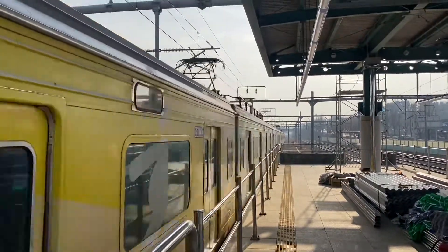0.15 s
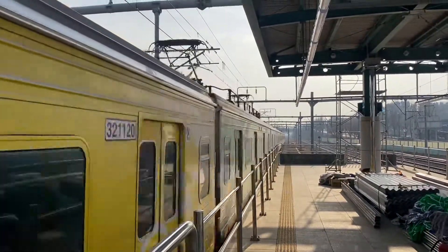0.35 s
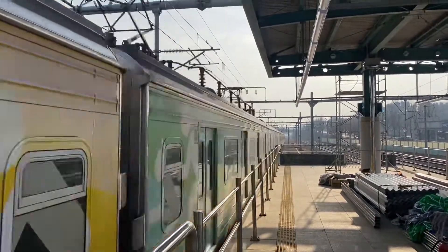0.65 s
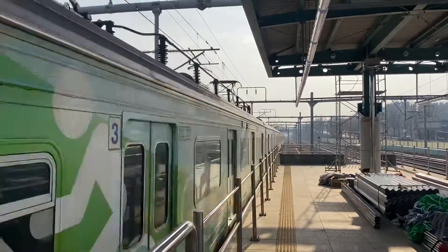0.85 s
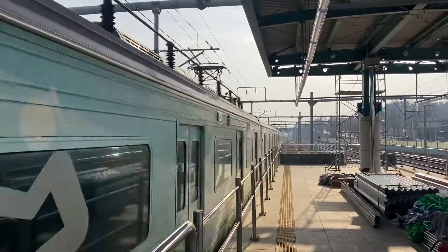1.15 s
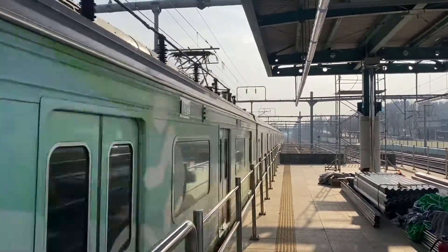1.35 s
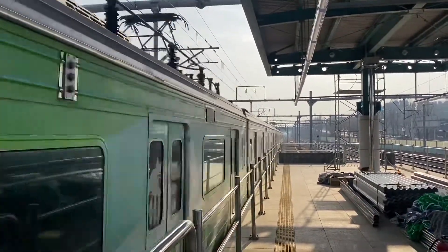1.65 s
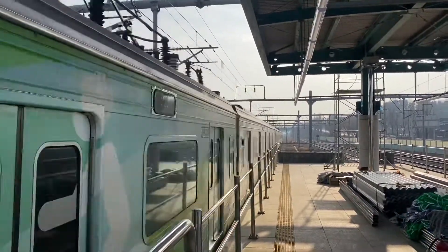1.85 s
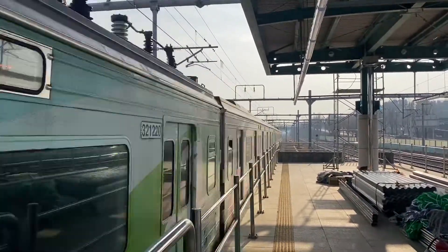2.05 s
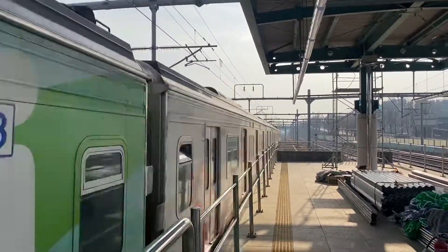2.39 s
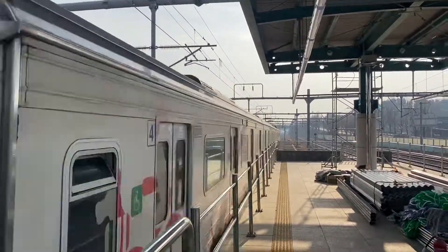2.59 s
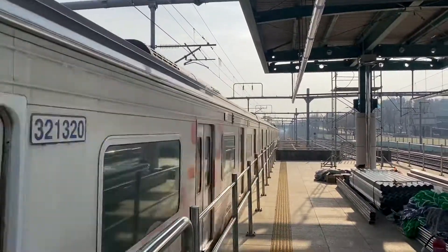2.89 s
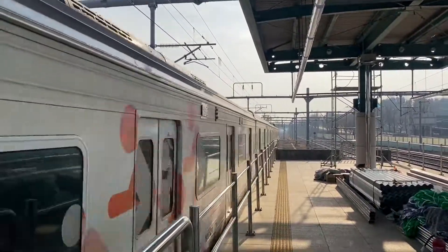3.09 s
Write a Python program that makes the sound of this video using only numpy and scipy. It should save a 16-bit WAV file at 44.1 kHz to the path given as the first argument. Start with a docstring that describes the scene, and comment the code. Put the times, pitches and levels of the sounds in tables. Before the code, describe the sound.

Electric commuter train brakes past very close, rumbling roar, sinking motor whine and buffeting air thumps.

```python
"""An electric commuter train brakes past an open platform, a step from a phone's two microphones.
Its wheels roar on the rails: patchy stereo noise through wheel and rail resonances, with a hissing ring.
Two drive whines, sums of sine partials, sink with the speed and swell as motor bogies pass.
The air dragged along by the cars buffets the microphones: lumpy low noise and single decaying thumps."""
import sys
import numpy as np
from scipy import signal
from scipy.fft import rfft, irfft, next_fast_len
from scipy.io import wavfile
from scipy.ndimage import uniform_filter1d, map_coordinates

SR = 44100
rng = np.random.default_rng(int(sys.argv[2]) if len(sys.argv) > 2 else 0)


def master(y):
    """Save y as 16-bit WAV."""
    cut = np.clip(np.atleast_2d(y).T, -1, 1)
    pcm = np.round(cut * 32767)  # scale
    wavfile.write(sys.argv[1], SR, pcm.astype(np.int16))


def decibels_to_gain(level_db):
    """Convert a level in decibels to a linear amplitude gain (20 dB per decade)."""
    exponent = np.asarray(level_db, float) / 20
    return 10 ** exponent


N = 142443  # samples

# train speed, as the pitch of the high drive whine: (time [s], frequency [Hz])
HIGH_WHINE_PITCH = [(0, 768), (.7, 752), (1.3, 730), (1.8, 718), (2.0, 704), (2.2, 698), (2.5, 686),
                    (2.75, 662), (3.23, 645)]
# drive whine partials before their common trim: (time [s], level [dB])
LOW_WHINE_LEVEL = [(0.0, -18.5), (0.03, -33.5), (0.05, -28), (0.07, -35.5), (0.12, -44), (0.3, -36),
                   (0.35, -22), (0.38, -37), (0.4, -22), (0.46, -57), (0.48, -24.5), (0.58, -30.5),
                   (0.61, -18.5), (0.65, -14.5), (0.67, -36), (0.7, -19), (0.78, -33.5), (0.8, -25),
                   (0.86, -45), (0.91, -27), (0.96, -40), (1.06, -26.5), (1.16, -44), (1.18, -49),
                   (1.25, -37), (1.29, -36), (1.33, -33.5), (1.47, -37), (1.5, -25), (1.57, -34),
                   (1.59, -23), (1.65, -41.5), (1.67, -22.5), (1.95, -21), (1.99, -25), (2.09, -33.5),
                   (2.1, -27), (2.19, -26), (2.26, -19), (2.28, -26), (2.33, -14), (2.37, -31),
                   (2.43, -13.5), (2.47, -41.5), (2.5, -24.5), (2.55, -35), (2.98, -39.5), (3.0, -48),
                   (3.04, -33), (3.07, -42), (3.19, -43), (3.23, -60)]
HIGH_WHINE_LEVEL = [(0.0, -40.5), (0.06, -30.5), (0.12, -38), (0.15, -20.5), (0.18, -34.5), (0.22, -18.5),
                    (0.26, -23.5), (0.31, -23), (0.37, -37), (0.47, -27.5), (0.49, -41), (0.55, -29),
                    (0.57, -38), (0.67, -29), (0.79, -35.5), (0.83, -32), (0.88, -34.5), (0.91, -27),
                    (0.95, -45), (1.04, -29.5), (1.13, -46), (1.4, -34.5), (1.42, -42.5), (1.65, -33.5),
                    (1.74, -44.5), (1.81, -25), (1.87, -36), (1.91, -26.5), (2.01, -29), (2.08, -25.5),
                    (2.17, -32), (2.21, -23.5), (2.31, -34.5), (2.34, -21), (2.46, -39), (2.47, -27.5),
                    (2.74, -37), (2.76, -42), (3.21, -41), (3.23, -43.5)]
# the octave over the low whine, before the trim: (time [s], level [dB])
LOW_WHINE_OCTAVE = [(0, -39), (.7, -56), (.82, -32), (1, -50.5), (1.14, -40.5), (1.3, -48.5), (1.65, -49.5),
                    (1.8, -40.5), (1.93, -34.5), (2, -36), (2.1, -30.5), (2.19, -33), (2.24, -53),
                    (2.3, -30), (2.4, -42), (2.5, -37.5), (2.65, -56), (3.23, -61)]
# faint tone an octave under the high whine, before the trim: (time [s], level [dB])
HIGH_WHINE_UNDERTONE = [(0, -51), (1.7, -54.5), (1.9, -39), (2.1, -32), (2.3, -32), (2.5, -31),
                        (2.6, -37.5), (2.75, -51), (3.23, -57)]
# faint upper partials, before the trim:
# (time [s], 3rd of the low [dB], 2nd of the high [dB], 3rd of the high [dB])
WHINE_OVERTONES = [(0, -48, -49, -56.5), (.3, -48, -50, -68), (.5, -54, -51, -57), (1.5, -78, -50, -54.5),
                   (1.65, -49, -43, -55), (1.75, -46, -40, -53), (1.85, -41, -41, -64),
                   (1.96, -48, -39.5, -43.5), (2.08, -40.5, -52, -60), (2.2, -41, -63.5, -50),
                   (2.55, -75, -64, -54.5), (2.7, -68, -70, -61), (3.23, -66, -68, -79)]

# slipstream strength at the microphones, before its gain and random swing: (time [s], level [dB])
DRAUGHT_LEVEL = [(0.0, -12.5), (0.025, -12), (0.045, -21.5), (0.07, -14.5), (0.1, -22.5), (0.16, -26.5),
                 (0.21, -22), (0.22, -30.5), (0.32, -20.5), (0.37, -31), (0.45, -23), (0.49, -54),
                 (0.52, -33), (0.74, -21), (0.76, -23.5), (0.79, -25), (0.81, -18.5), (0.835, -23),
                 (0.86, -16.5), (0.89, -20.5), (0.94, -25.5), (0.99, -25), (1.02, -23), (1.07, -31.5),
                 (1.61, -31), (1.72, -22.5), (1.74, -28), (1.79, -18.5), (1.95, -34.5), (2.0, -24.5),
                 (2.06, -23.5), (2.17, -23), (2.3, -25.5), (2.42, -22.5), (2.5, -25), (2.6, -22),
                 (2.65, -25), (2.7, -23), (2.78, -25), (2.84, -31), (2.89, -23.5), (2.95, -28.5),
                 (3.02, -22), (3.08, -22.5), (3.15, -25), (3.23, -28.5)]
# relative spectrum of the buffeting: (frequency [Hz], density [dB per Hz])
BUFFET_SPECTRUM = [(20, -22), (45, 1.5), (80, 4.5), (140, -3), (255, -6.5), (500, -8.5), (800, -20.5),
                   (1200, -38.5), (2000, -49.5), (3300, -100)]
# single air thumps: (start [s], level before the trim [dB], pitch before the glide [Hz],
# length of the swell up to its peak [cycles])
AIR_THUMPS = [(0.007, -8.5, 396, 1.14), (0.014, -9.5, 550, 1.6), (0.02, -9, 330, 1.5),
              (0.031, -7.5, 141.4, 1.26), (0.046, -13, 447, 1.1), (0.056, -1.5, 196.6, 1.2),
              (0.067, -11.5, 187.5, 1.1), (0.086, -9, 109.3, 1.4), (0.104, -12, 111.7, 1.1),
              (0.197, -12, 97, 1.1), (0.755, -8.5, 129.7, 2.1), (0.77, -7, 106.5, 2.1),
              (0.772, -7, 292, 1.17), (0.783, -12, 200, 1.5), (0.801, -11, 131, 1.6),
              (0.807, -6.5, 358, 1.1), (0.817, -0.5, 276, 1.46), (0.827, -4, 520, 1),
              (0.844, -0.5, 428, 0.86), (0.851, -6.5, 295, 1.8), (0.862, -5, 195, 1.3),
              (0.896, -14, 160, 1.7), (0.914, -12.5, 185.4, 1.8), (0.928, -9.5, 164.5, 0.98),
              (0.963, -12.5, 120.5, 0.91), (1.004, -12.5, 139.7, 1.5), (1.03, -16.5, 151.2, 1.5),
              (1.775, -34, 390, 1.7), (2.681, -12.5, 286, 2.2), (2.706, -13, 273, 2.46),
              (2.747, -16, 201, 1.1), (2.884, -20, 272, 7.5), (2.9, -21, 272.3, 4.3),
              (2.921, -22, 147, 2.2), (2.977, -14, 164, 1.1), (3, -14.5, 267, 1.4), (3.036, -18, 290, 1.6),
              (3.05, -14, 323, 1.2), (3.095, -12.5, 257, 1.1), (3.116, -18, 99.4, 1.35),
              (3.138, -18, 83, 0.96), (3.155, -15, 84, 0.83), (3.19, -24, 90, 1.5)]

# rolling noise strength, before its gain and swing: (time [s], level [dB])
ROLLING_LEVEL = [(0.0, -37), (0.11, -40), (0.2, -38.5), (0.81, -38.5), (0.83, -36.5), (0.88, -39.5),
                 (1.46, -41.5), (1.93, -39.5), (3.0, -43), (3.07, -42.5), (3.23, -45.5)]
# gain of the roar's treble: (time [s], level [dB])
TREBLE_SHEEN = [(0, -0.5), (.5, .5), (1.3, 1.5), (2, .5), (2.7, 0.5), (3.23, -2)]
# relative spectrum of the roar: (frequency [Hz], density [dB per Hz])
ROAR_SPECTRUM = [(30, -37), (150, -7), (300, -13), (450, -7), (600, -13), (800, -9), (950, -15),
                 (1180, -16.5), (1800, -23.5), (2500, -27.5), (3400, -32.5), (5000, -36), (6800, -41),
                 (9200, -44.5), (12000, -49), (15600, -51.5)]
# wheel and rail resonances in the roar: (frequency [Hz], width [Hz], level [dB])
WHEEL_RESONANCES = [(1340, 260, 1.5), (2107, 180, 3.5), (2945, 320, 5.5), (3550, 200, 5), (4390, 310, 3.5)]
# the wheels' ring, a band of hiss that swells as they pass: (time [s], level [dB])
RING_LEVEL = [(0, -68), (.5, -50), (1, -46.5), (1.4, -51.5), (1.8, -54), (2.2, -45), (2.6, -48.5),
              (2.85, -62), (3.23, -51)]

# likeness of the microphone pair, and its continuation upwards: (frequency [Hz], likeness [0-1])
MIC_LIKENESS = [(60, 0.99), (130, 0.87), (290, 0.34), (640, 0.56), (1410, 0.19), (3100, 0.81), (5500, 0.53)]
MIC_LIKENESS_TOP = [(6800, .97), (8000, .995), (16000, .995)]
# level lean of the pair: (frequency [Hz], left minus right [dB])
MIC_LEAN = [(60, -2.2), (110, 0.5), (200, -0.2), (380, 0.3), (700, 2.5), (1290, 0.2), (2380, 2.5),
            (4400, 2.6), (8120, 0), (15000, -0.26)]
# phase lead of the left port, and its continuation upwards: (frequency [Hz], left leads by [rad])
MIC_LEAD = [(0, -0.5), (860, 0.63), (2070, 7.5), (2760, 5.5), (5000, 4.5)]
MIC_LEAD_TOP = [(7000, 2 * np.pi), (9050, np.pi), (11050, 0), (15200, -2 * np.pi), (17300, -3 * np.pi)]


def unit(x):
    """x at rms 1."""
    return x / np.sqrt(np.mean(np.abs(x) ** 2) + 1e-20)


def along(points, hz):
    """Reads (frequency [Hz], value) points on a log frequency axis."""
    f, v = np.transpose(points)
    return np.interp(np.log(hz + 1), np.log(f + 1), v)


def curves(rows):
    """One value per sample for each column after the time."""
    s, *columns = np.transpose(rows)
    return [np.interp(np.arange(N) / SR, s, column) for column in columns]


def wobble(rate):
    """A smooth random curve through rate knots a second, at most 199."""
    knots = rng.standard_normal(int(N * 200 / SR) + 8)
    return map_coordinates(knots, [np.arange(N) * min(rate, 199) / SR])


def filtered(x, response):
    """x times a complex response of frequency."""
    m = next_fast_len(N + 8192)
    return irfft(rfft(x, m) * response(np.fft.rfftfreq(m, 1 / SR)), m)[..., :N]


def half_angle(alike):
    """Mixing angle [rad] of a shared and a differing signal that gives two channels this likeness."""
    return np.arccos(np.clip(alike, -1, 1)) / 2


def pair(shared, differing, alike):
    """Left and right as the sum and difference of a shared and a differing signal."""
    mid = np.cos(half_angle(alike)) * shared
    side = np.sin(half_angle(alike)) * differing
    return np.array([mid + side, mid - side])


def rush(gain, patchy_db):
    """Stereo noise of rms 1, with random gain patches in time and frequency, as alike as the two ports."""
    z = signal.stft(rng.standard_normal((2, N)), nperseg=512)[2]
    patches = uniform_filter1d(rng.standard_normal(z.shape[1:]), size=5, axis=0)
    patches = uniform_filter1d(patches, size=12, axis=1)
    two = signal.istft(z * decibels_to_gain(patchy_db * unit(patches)), nperseg=512)[1][:, :N]

    def mid_side_gain(hz):
        angle = half_angle(along(MIC_LIKENESS + MIC_LIKENESS_TOP, hz))
        return gain(hz) * np.array([np.cos(angle), np.sin(angle)])

    mid, side = filtered(two, mid_side_gain)
    return unit(np.array([mid + side, mid - side]))


def whines():
    """Partials of two drive tones tied to the speed: partly clean, partly blurred by rough teeth and many axles."""
    low_ratio = .5935  # pitch of the low whine over the high one
    steady_share = .85  # largest power share of clean tone
    clear_db, fade_db = 9, 12  # that share holds this far below the loudest, then fades to none over 12 dB
    blur_rate, alike, trim_db = 40.085, 0.56, 0.5  # knots a second; likeness; dB
    hz, = curves(HIGH_WHINE_PITCH)
    phase = 2 * np.pi * np.cumsum(hz) / SR
    orders = [low_ratio, 1, 2 * low_ratio, .5, 3 * low_ratio, 2, 3]
    levels = curves(LOW_WHINE_LEVEL) + curves(HIGH_WHINE_LEVEL) + curves(LOW_WHINE_OCTAVE)
    levels += curves(HIGH_WHINE_UNDERTONE) + curves(WHINE_OVERTONES)
    out = np.zeros((2, N))
    for order, db in zip(orders, levels):
        blur = [unit(wobble(blur_rate) + 1j * wobble(blur_rate)) for _ in range(2)]
        steady = steady_share * np.clip(1 + (db - db.max() + clear_db) / fade_db, 0, 1)
        shared = np.sqrt(steady) + np.sqrt(1 - steady) * blur[0]
        tone = np.real(pair(shared, blur[1], alike) * np.exp(1j * order * phase))
        out += tone * np.sqrt(2) * decibels_to_gain(db + trim_db)
    return out


def buffeting():
    """Lumpy low noise of the dragged air, its deepest part swinging less than the rest."""
    gain_db, deep_swing = -0.5, .65
    strength_db, = curves(DRAUGHT_LEVEL)
    mean_db = strength_db.mean()
    air = rush(lambda hz: decibels_to_gain(along(BUFFET_SPECTRUM, hz)), patchy_db=1.5)
    deep = filtered(air, lambda hz: 1 / (1 + (hz / 110) ** 4))
    swing_db = strength_db - mean_db + 2.24 * wobble(35.01)
    swung = decibels_to_gain(deep_swing * swing_db) * deep + decibels_to_gain(swing_db) * (air - deep)
    return decibels_to_gain(mean_db + gain_db) * swung


def thumps():
    """Eddies bursting on the microphones: short gliding sines under a swell, of random polarity."""
    trim_db, edge_db, alike = -3, -13.5, 0.92  # edge: a tone at 2.5 times the pitch
    onset = .95  # smaller = more sudden start, longer tail
    glide_depth, cut_hz = .02, 60
    hits, t = np.zeros((2, N + SR)), np.arange(SR // 10) / SR
    chance = rng.standard_normal((len(AIR_THUMPS), 3))
    for (s, db, hz, cycles), (flip, glide, lean) in zip(AIR_THUMPS, chance):
        u = t * hz / max(cycles, .3)  # 1 at the peak of the swell
        swell = u ** onset * np.exp(onset * (1 - u))
        tone = np.sin(2 * np.pi * hz * t * (1 + glide_depth * glide * u))
        edge = decibels_to_gain(edge_db) * np.sin(5 * np.pi * hz * t)
        body = swell ** 2 * (tone + edge)
        differing = np.clip(lean, -1, 1) * np.roll(body, 60)
        hit = np.sign(flip) * pair(body, differing, alike)
        hits[:, round(s * SR):][:, :len(t)] += decibels_to_gain(db + trim_db) * hit
    return filtered(hits[:, :N], lambda hz: (1j * hz / (cut_hz + 1j * hz)) ** 2)


def slipstream():
    """Air dragged along by the cars: low buffeting with single thumps on the microphones."""
    return buffeting() + thumps()


def wheel_ring():
    """The wheels' ring: patchy hiss in one resonant band, swelling as they pass."""
    centre_hz, width_hz = 2853, 420
    hiss = rush(lambda hz: 1 / (1 + (2 * (hz - centre_hz) / width_hz) ** 2), patchy_db=3.5)
    return decibels_to_gain(curves(RING_LEVEL)[0]) * hiss


def rolling():
    """Wheel and rail roar through their resonances; the low part follows the bogies more strongly."""
    gain_db, bass_swing = 9.5, 3.45
    strength_db, = curves(ROLLING_LEVEL)
    sheen_db, = curves(TREBLE_SHEEN)
    mean_db = strength_db.mean()

    def roar_gain(hz):
        peaks_db = sum(db / (1 + (2 * (hz - c) / w) ** 2) for c, w, db in WHEEL_RESONANCES)
        return decibels_to_gain(along(ROAR_SPECTRUM, hz) + peaks_db)

    roar = rush(roar_gain, patchy_db=1.12)
    low = filtered(roar, lambda hz: 1 / (1 + (hz / 900) ** 4))
    top = filtered(roar, lambda hz: 1 - 1 / (1 + (hz / 3600) ** 4))
    middle = roar - low - top
    swing_db = strength_db - mean_db + 0.17 * wobble(13.0)
    swung = decibels_to_gain(bass_swing * swing_db) * low + decibels_to_gain(swing_db) * (middle + decibels_to_gain(sheen_db) * top)
    return wheel_ring() + decibels_to_gain(mean_db + gain_db) * swung


def scene():
    """All sources of the train passing a step from the microphones."""
    return rolling() + whines() + slipstream()


def low_pass(x):
    """Removes everything above the highest recorded frequency."""
    return signal.sosfilt(signal.butter(12, 15760, fs=SR, output="sos"), x)


def record(dry):
    """The phone's two ports differ in level and phase and cut the deepest bass; peaks are rounded."""
    low_cut_hz, ceiling = 41, 1.05  # ceiling: full scale = 1

    def half_difference(hz):
        lead = np.interp(hz, *np.transpose(MIC_LEAD + MIC_LEAD_TOP))
        return decibels_to_gain(along(MIC_LEAN, hz) / 2) * np.exp(.5j * lead)

    def port_response(hz):
        bass_cut = (1j * hz / (low_cut_hz + 1j * hz)) ** 2
        half = half_difference(hz)
        return bass_cut * np.array([half, 1 / half])

    ports = filtered(dry, port_response)
    mix = ports / (1 + np.abs(ports / ceiling) ** 4) ** (1 / 4)
    return low_pass(mix)


dry = scene()
out = record(dry)
master(out)
```